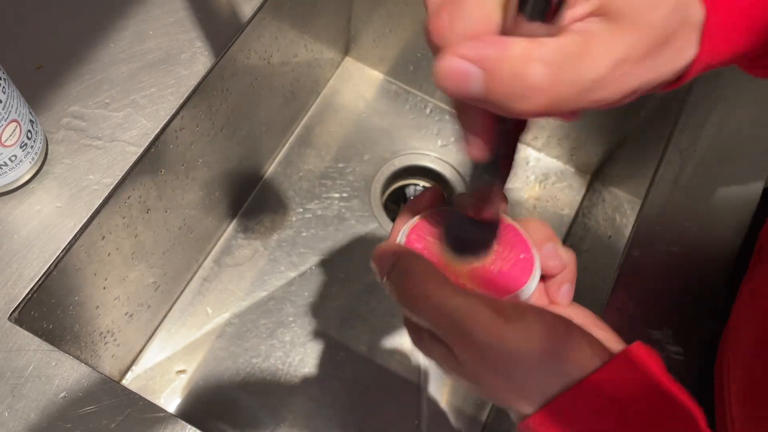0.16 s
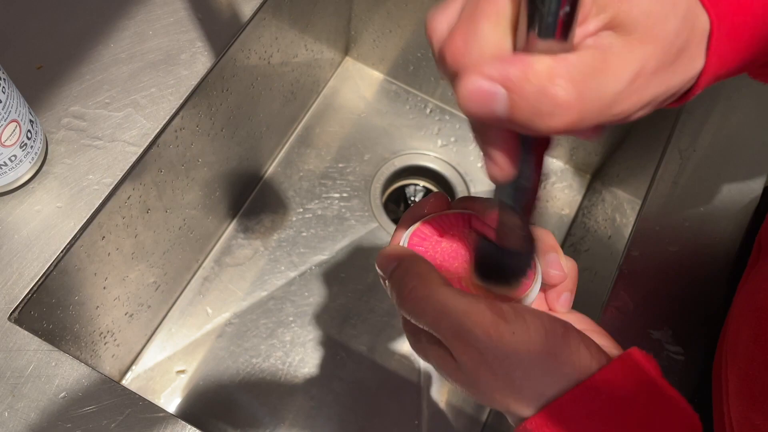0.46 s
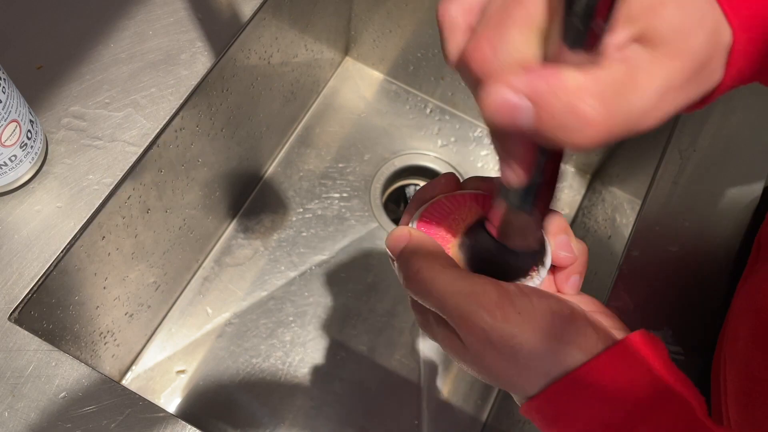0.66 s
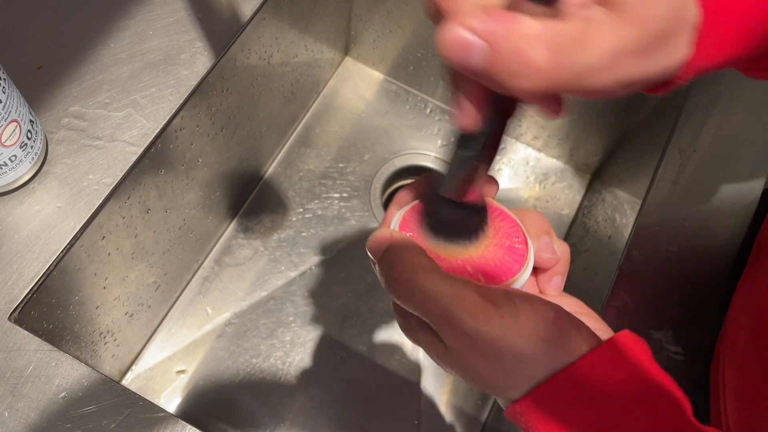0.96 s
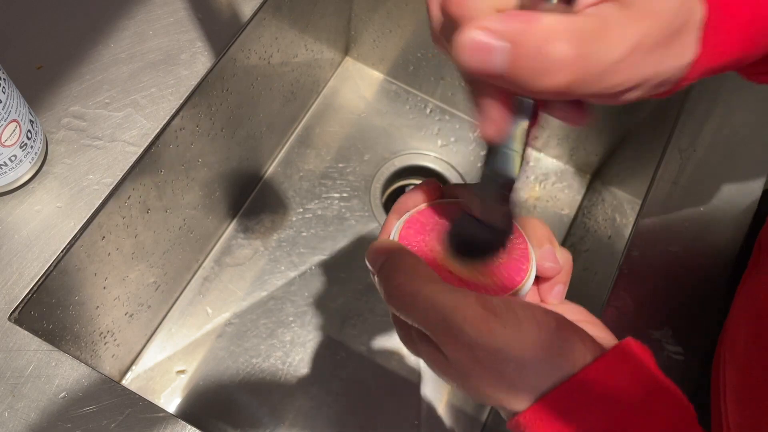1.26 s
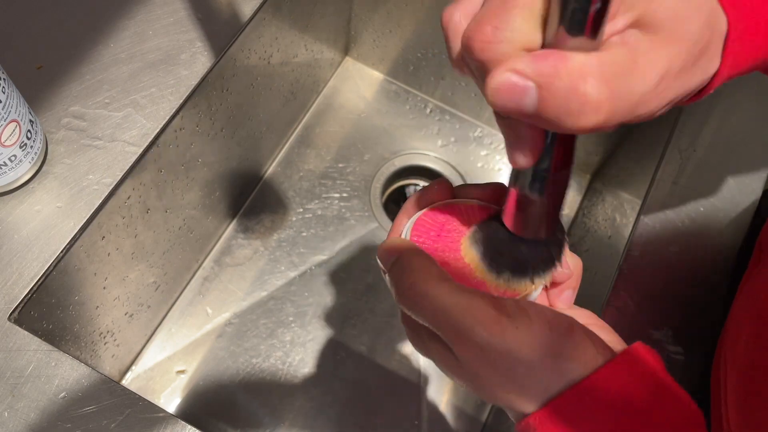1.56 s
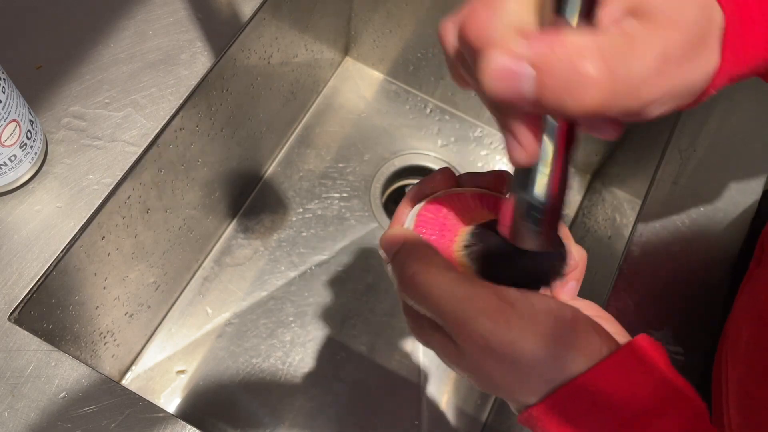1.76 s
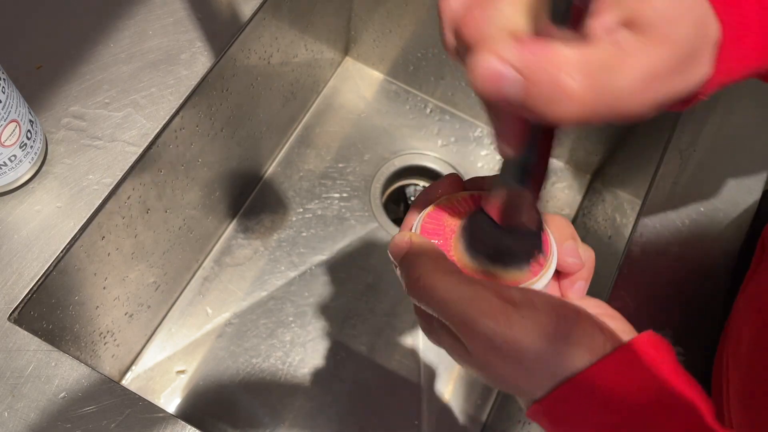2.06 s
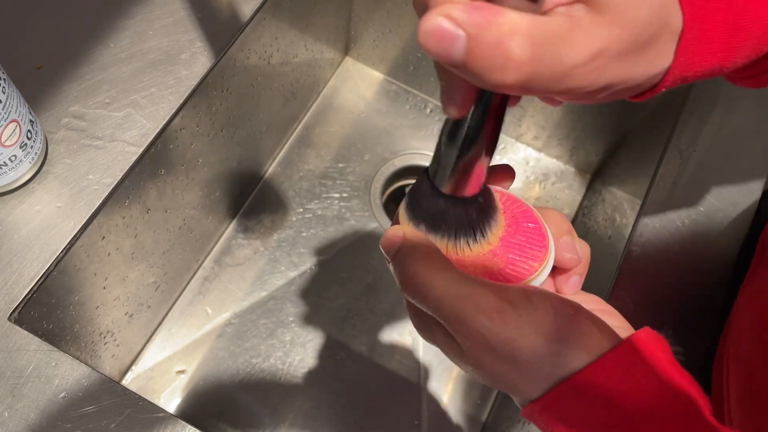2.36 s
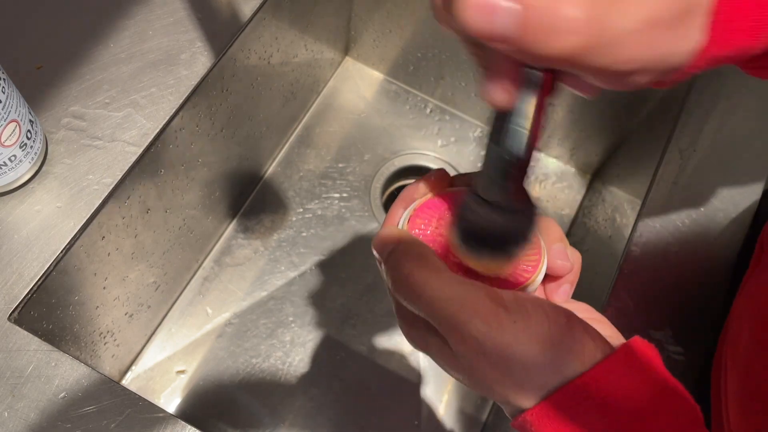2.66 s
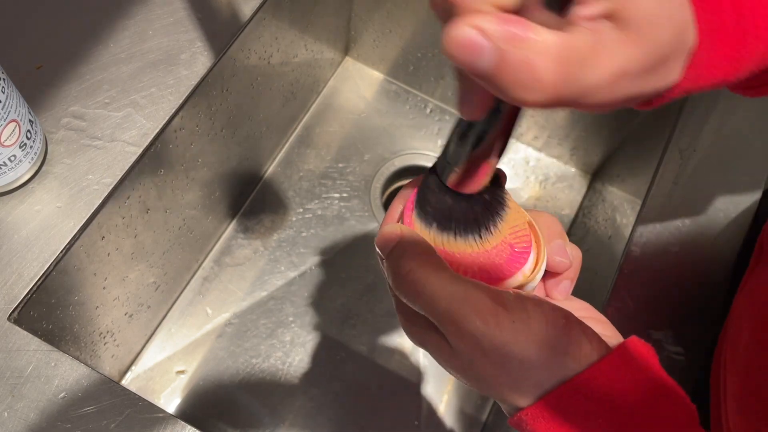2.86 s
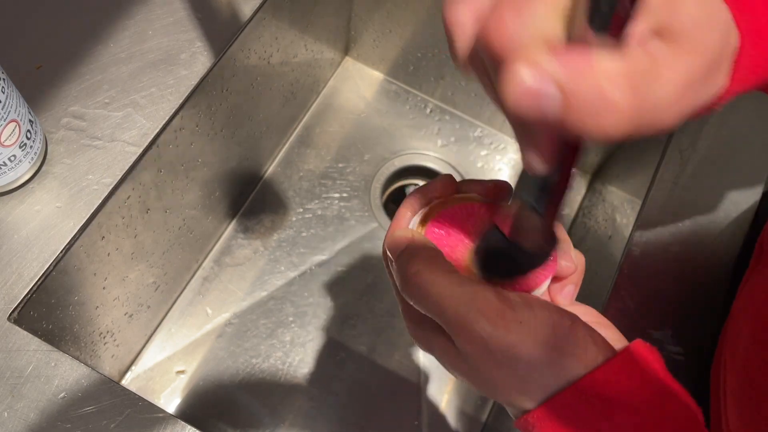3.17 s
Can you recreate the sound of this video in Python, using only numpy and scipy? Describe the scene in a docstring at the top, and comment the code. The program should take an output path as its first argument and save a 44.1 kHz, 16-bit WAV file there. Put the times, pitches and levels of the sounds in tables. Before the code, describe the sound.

Quick, scratchy strokes of wet bristles rubbing over a soapy silicone pad in a sink.

```python
"""At a steel sink, a wet brush scrubs back and forth on a ridged silicone mat, nine strokes a second.
Each stroke is a swell of tiny bristle flicks; as the lather builds it squelches and bubbles pop.
Wet clumps of bristles slap the mat, and a few hard pushes knock on it. The basin answers with a
short metallic echo, over the low hum of an appliance."""
import sys
import numpy as np
from scipy import signal
from scipy.fft import rfft, irfft
from scipy.io import wavfile
from scipy.ndimage import uniform_filter1d

SR = 44100
rng = np.random.default_rng(int(sys.argv[2]) if len(sys.argv) > 2 else 0)


def materialize(psi):
    """Save the field psi as 16-bit PCM at rate SR to the path in sys.argv[1].

    A 1-D psi becomes a single channel; in a 2-D psi each row is a channel.
    """
    bounded = np.clip(np.atleast_2d(psi).T, -1, 1)
    quanta = np.round(bounded * 32767).astype(np.int16)
    wavfile.write(sys.argv[1], SR, quanta)


N = 145530

# Cue lists; levels are relative within each layer.
# brush strokes: t/s of fastest motion, level/dB, half length/s, wet body trim/dB
STROKES = [(.002, -49.5, 0.012, 1.5), (0.084, -51, 0.02, 7.5), (0.198, -46, 0.022, -1),
           (.293, -47.5, 0.023, 2.5), (0.409, -45.5, 0.018, 0), (0.504, -44.5, 0.016, 2),
           (0.551, -57.5, 0.012, 5.5), (0.608, -41.5, 0.013, -1), (0.715, -48, 0.023, 0.5),
           (0.825, -47, 0.022, 0.5), (0.937, -44, 0.02, 1), (1.046, -49.5, 0.025, 5),
           (1.145, -53.5, 0.031, 1.5), (1.248, -47.5, 0.02, 2.5), (1.295, -58.5, 0.014, 16.5),
           (1.374, -46, 0.021, 4.5), (1.501, -50.5, 0.028, 5.5), (1.602, -51, 0.026, 2.5),
           (1.721, -49, 0.031, 2), (1.839, -49, 0.031, 4.5), (1.947, -41, 0.015, -7),
           (2.066, -48.5, 0.025, 2.5), (2.177, -45.5, 0.024, 0), (2.305, -48, 0.028, 0.5),
           (2.398, -47, 0.016, 2), (2.445, -51.5, 0.015, 5.5), (2.496, -54, 0.028, 5),
           (2.525, -50.5, 0.035, 7), (2.613, -52.5, 0.019, 2.5), (2.743, -49.5, 0.016, 1.5),
           (2.793, -49.5, 0.024, -2), (2.889, -55, 0.019, 10), (2.925, -53, 0.018, 3.5),
           (3.015, -54.5, 0.024, 1.5), (3.131, -45.5, 0.021, 5), (3.248, -48, 0.023, 8)]
# bristle clumps flicking off a ridge: t/s, level/dB, f/Hz, crack trim/dB
SNAPS = [(.182, -40, 4500, -20), (0.2018, -42, 4500, -16), (.333, -42, 3500, -22), (0.482, -48, 5000, 3),
         (0.603, -39, 5000, -20), (.711, -41, 3000, -22), (0.9387, -38, 2600, -18), (1.009, -42, 3200, -18),
         (1.346, -43, 2200, -22), (1.3735, -37, 2400, -18), (1.926, -42, 3500, -16),
         (1.945, -29, 5000, -14), (2.172, -35, 4500, -18), (2.508, -37, 3200, -22),
         (2.5382, -32, 3200, -26), (2.605, -36, 4000, -20), (2.61, -35, 2600, -22),
         (2.7743, -28, 5600, -25), (2.7838, -18, 2800, -2), (2.7866, -33, 4500, 2), (3.006, -43, 3000, -18),
         (3.084, -41, 3200, -14), (3.2071, -27, 2700, -28), (3.2127, -18.5, 3000, -19),
         (3.2171, -16, 5200, -20)]
# bubbles in the lather: t/s, level/dB, f/Hz, decay/s
POPS = [(.037, -34.5, 1333, 0.00044), (0.2458, -29.5, 2235, 0.0013), (0.878, -35, 2340, 0.00053),
        (.939, -39.5, 1370, .0025), (1.098, -42.5, 970, 0.0013), (1.373, -36.5, 1606, 0.0037),
        (1.774, -41.5, 1810, 0.0017), (2.5072, -30, 1352, 0.0025), (2.536, -23.5, 1930, 0.001),
        (2.6953, -35, 1155, 0.0023), (2.7752, -24.5, 1830, 0.0024), (3.096, -44, 1430, 0.0016),
        (3.1, -26.5, 1860, 0.0014), (3.2168, -18.5, 1620, 0.0026)]
# lather squeezed from under the brush: t/s, level/dB, decay/s
SQUELCHES = [(1.733, -58, 0.027), (1.945, -46.5, 0.01), (1.953, -50.5, 0.007), (2.166, -48.5, 0.016),
             (2.603, -43.5, 0.0071), (2.609, -40, 0.0039), (2.781, -43.5, 0.0027), (2.885, -34, 0.0079),
             (3.039, -43.5, 0.0037), (3.208, -36, 0.011), (3.217, -39, 0.0057)]
# hollow knocks of the mat: t/s, level/dB, f/Hz
THUDS = [(2.784, -42, 544), (2.89, -49, 273), (3.216, -51, 241)]

FIZZ_EQ = [(1000, -29), (2300, -11), (3200, 1.5), (4300, -1), (5100, 0.5), (6300, -0.5), (8000, -1.5),
           (10500, -6), (13300, -14.5), (15600, -15.5)]  # bright bristle flicks: f/Hz, level/dB
BODY_EQ = [(150, -12.5), (500, -28.5), (830, 0), (1050, -2), (1300, 0.5), (1600, 3.5), (2000, 3), (2600, 0),
           (6000, -8.5)]  # wet crackle of a stroke: f/Hz, level/dB
CRACK_EQ = [(150, -15), (2000, -4), (5000, -7), (8500, 10.5), (11000, -2.5), (13000, -6), (16000, -17)]  # thin top of a snap: f/Hz, level/dB
SQUELCH_EQ = [(60, 2.5), (150, -6.5), (270, 5), (400, -0.5), (520, -7.5), (760, -2.5), (1020, -5),
              (1700, -1.5), (3700, -7.5), (4700, -13), (14000, -44)]  # squeezed lather: f/Hz, level/dB
SCATTER_SEND = [(100, -23), (300, 12.5), (600, 11.5), (1700, -28), (2600, -7.5), (3500, -7), (4500, -10),
                (5200, -2), (6300, -5.5), (7300, -41), (8200, -12), (9400, -4.5), (11000, -8), (12700, -13),
                (14000, -10)]  # rubbing that arrives scattered: f/Hz, level/dB
STEEL_MODES = [(965, -7, 0.14), (1186, 0.5, 0.083), (1223, -2.5, 0.062), (1532, 9.5, 0.061),
               (1623, 1.5, 0.072), (1853, -8, 0.26), (2124, -6.5, 0.21), (2440, -26, 0.075),
               (3260, -4, 0.067), (3640, -6, 0.08), (5080, 8, 0.048)]  # ring of the basin: f/Hz, level/dB, T60/s
WALL_ECHOES = [(.0021, -62), (.0036, -41), (.0058, -24), (.0095, -25.5)]  # slapback off the basin walls: delay/s, level/dB
PORT_PHASE = [(20, 0), (2000, .05), (2500, 1.1), (2800, .35), (3700, .3), (4400, 1.0), (4850, -.3),
              (5500, .5), (6200, 1.6), (7100, 3.0), (8400, 3.25), (10200, 6.1), (12000, 6.6), (13300, 9.2),
              (15200, 9.6)]  # left microphone port's lead over the right: f/Hz, phase/rad
PORT_BALANCE = [(20, 1.5), (1900, -0.5), (2400, 1), (3300, -0.5), (4400, -8), (5400, 0.5), (16000, -0.5)]  # left port minus right: f/Hz, level/dB
ROOM_T60 = [(200, 0.1), (1500, 0.2), (4000, 0.066), (15000, 0.063)]  # room decay: f/Hz, T60/s
ROOM_SEND = [(100, -55), (500, -1), (1700, -19.5), (3500, -7), (6000, -13), (8000, -25.5), (15000, -33)]  # reverb send: f/Hz, level/dB
HUM_TONES = [(58.5, -52), (114, -64.5)]  # appliance partials: f/Hz, level/dB
HUM_FADER = [(0, 3), (.85, 1.5), (1.3, -14.5), (1.75, -5.5), (2.15, -0.5), (3.3, 3)]  # the hum dips and comes back: t/s, gain/dB
RUMBLE_EQ = [(15, 1), (25, -4), (40, -1.5), (48, 7.5), (57, 7), (75, 10), (95, -9), (116, 3), (150, -10.5),
             (290, -15), (400, -25), (900, -30.5), (2500, -42.5), (7000, -55.5), (16000, -44)]  # low noise bed: f/Hz, level/dB


def scrubbing():
    """The brush, direct and scattered to each side; the ridges make all of it flutter."""
    envelopes = strokes()
    ridges = flutter(hz=131, depth_db=1.37)
    (dry, wet), left, right = [ridges * bristles(*envelopes) for _ in range(3)]
    send = amp(read(SCATTER_SEND, np.fft.rfftfreq(N, 1 / SR)))
    scatter = irfft(rfft([left.sum(0), right.sum(0)]) * send, N)
    return tuft_drift(dry, depth_db=4.0) + tuft_drift(wet, depth_db=5.0), scatter


def strokes(rise=0.82, fall=0.84, skirt=1.486, catch=0.72, glide_db=-3, drag_db=-72):
    """Fizz and body envelopes: each stroke glides in quietly, catches, swells and fades."""
    t = np.arange(0, N, 16) / SR
    fizz = body = 0
    for s, db, half, wet_db in STROKES:
        width = half * np.where(t < s, rise, fall)
        swell = np.exp(-(abs(t - s) / width) ** skirt / 2)
        swell *= amp(glide_db * (t < s - catch * half))
        fizz += (amp(db) * swell) ** 2
        body += (amp(db + wet_db) * swell) ** 2
    return [np.interp(np.arange(N) / SR, t, np.sqrt(power + amp(drag_db) ** 2))
            for power in (fizz, body)]


def bristles(fizz, body):
    """Thousands of flicks a second blur into dry fizz on top and wet crackle underneath."""
    dry = amp(-3.0) * fizz * colour(clicks(per_s=10000, spread_db=4), FIZZ_EQ)
    wet = amp(-11.5) * body * colour(clicks(per_s=3500, spread_db=1.5), BODY_EQ)
    return np.array([dry, wet])


def tuft_drift(x, depth_db, bands=4, frames=36):
    """The colour of the rubbing drifts as the tuft bends and the foam moves."""
    spectra = signal.stft(x, nperseg=256, noverlap=192)[2]
    patches = uniform_filter1d(rng.standard_normal(spectra.shape), bands, axis=0)
    patches = uniform_filter1d(patches, frames, axis=1)
    return signal.istft(spectra * amp(depth_db * unit(patches)), nperseg=256, noverlap=192)[1][:N]


def snaps(cycles=1.83, crack_s=0.00069):
    """A wet clump slaps the mat: a cycle or two at its own pitch, and a thin bright crack."""
    t = np.arange(SR // 100) / SR
    slaps, cracks = np.zeros((2, N))
    for s, db, hz, crack_db in SNAPS:
        add(slaps, s, amp(db) * np.exp(-t * hz / cycles) * np.sin(2 * np.pi * hz * t))
        add(cracks, s, amp(db + crack_db) * np.exp(-t / crack_s) * rng.choice([-1, 1], len(t)))
    return slaps, colour(cracks, CRACK_EQ)


def lather(rise_per_s=5, pop_attack_s=0.00048, splash_s=0.0036, splash_hz=520, squeeze_attack_s=0.0027):
    """Bubbles ring with a slight upward bend and break in a splash; squeezed foam crackles."""
    t = np.arange(SR // 10) / SR
    pops, squeeze = np.zeros((2, N))
    lowpass = signal.butter(2, splash_hz, fs=SR)
    for s, db, hz, decay in POPS:
        phase = 2 * np.pi * hz * t * (1 + rise_per_s * t / 2)
        ring = np.exp(-t / decay) * np.sin(phase)
        a, b = signal.lfilter(*lowpass, rng.standard_normal((2, len(t))))
        spray = unit(a * np.cos(phase) + b * np.sin(phase))  # noise band around the bubble's pitch
        splash = 0.25 * np.exp(-t / splash_s) * spray
        add(pops, s, amp(db) * (1 - np.exp(-t / pop_attack_s)) * (ring + splash))
    for s, db, decay in SQUELCHES:
        add(squeeze, s, amp(db) * (1 - np.exp(-t / squeeze_attack_s)) * np.exp(-t / decay))
    squelch = colour(squeeze * clicks(per_s=7400, spread_db=4.5), SQUELCH_EQ)
    return amp(-1.24) * pops + amp(3.5) * squelch


def thuds(attack_s=0.00085, decay_s=0.0044):
    """The hardest pushes give a soft hollow knock."""
    t, out = np.arange(SR // 10) / SR, np.zeros(N)
    envelope = (1 - np.exp(-t / attack_s)) * np.exp(-t / decay_s)
    for s, db, hz in THUDS:
        add(out, s, amp(db) * envelope * np.sin(2 * np.pi * hz * t))
    return out


def foam(sizes=12, per_s=100, low_hz=750, high_hz=3020, level_db=-77):
    """Tiny bubbles of many sizes tick at random, dying within a cycle or two."""
    t, out = np.arange(SR // 80) / SR, np.zeros(N)
    for hz in np.geomspace(low_hz, high_hz, sizes):
        ticks = (rng.random(N) < per_s / sizes / SR) * amp(rng.uniform(-27, 0, N))
        ring = np.exp(-t * hz) * np.sin(2 * np.pi * hz * t)
        out += signal.oaconvolve(ticks, ring)[:N]
    return amp(level_db) * unit(out)


def basin(x, ring_db=-50):
    """Near walls echo the sound and the steel rings."""
    t = np.arange(SR // 4) / SR
    response = amp(ring_db) * sum(amp(db - 60 * t / t60) * np.cos(2 * np.pi * hz * t)
                                  for hz, db, t60 in STEEL_MODES)
    response[0] += 1  # direct sound
    for s, db in WALL_ECHOES:
        add(response, s, amp(db) * np.array([1, 2, 1]) / 4)  # each bounce has a softer top
    return signal.oaconvolve(x, response)[:N]


def ports(x, bearing=1):
    """Stereo image: two microphone ports differ in phase and level; bearing 0 is dead centre."""
    hz = np.fft.rfftfreq(2 * N, 1 / SR)
    side = bearing * np.array([[.5], [-.5]])
    pan = amp(side * read(PORT_BALANCE, hz)) * np.exp(1j * side * read(PORT_PHASE, hz))
    return irfft(rfft(x, 2 * N) * pan)[:, :N]


def room(x, predelay_s=0.00122, size=16384):
    """A short diffuse tail, different on each side."""
    noise = rng.standard_normal((2, size)) * (np.arange(size) > predelay_s * SR)
    hz, t, spectra = signal.stft(noise, SR, nperseg=256)
    decay = amp(-60 * t / read(ROOM_T60, hz)[:, None])
    tail = signal.istft(spectra * decay, SR, nperseg=256)[1]
    send = amp(read(ROOM_SEND, np.fft.rfftfreq(tail.shape[1], 1 / SR)))
    tail = irfft(rfft(tail / np.linalg.norm(tail[0])) * send)
    return signal.fftconvolve(x[None], tail[:, :size * 3 // 4], axes=1)[:, :N]


def appliance(rumble_db=-53, mono_below_hz=250):
    """A wavering hum in a bed of low rumble, centred in the bass and wide above."""
    t, hz = np.arange(N) / SR, np.fft.rfftfreq(N, 1 / SR)
    mid, side = rfft(rng.standard_normal((2, N))) * amp(read(RUMBLE_EQ, hz))
    side *= 0.89 * hz ** 2 / (hz ** 2 + mono_below_hz ** 2)
    rumble = amp(rumble_db) * unit(irfft([mid + side, mid - side], N))
    hum = sum(amp(db) * np.sqrt(2) * np.sin(2 * np.pi * (f * t + rng.random())) for f, db in HUM_TONES)
    return rumble + hum * amp(np.interp(t, *np.transpose(HUM_FADER)))


def clicks(per_s, spread_db):
    """A random train of clicks, a few louder than the rest."""
    size = amp(spread_db * np.minimum(rng.exponential(1, N), 4.5))
    return unit(size * rng.choice([-1, 1], N) * (rng.random(N) < per_s / SR))


def flutter(hz, depth_db):
    """A random tremolo whose motion rolls off above hz."""
    rolloff = 1 + (np.fft.rfftfreq(N, 1 / SR) / hz) ** 4
    wander = irfft(rfft(rng.standard_normal(N)) / rolloff, N)
    return amp(depth_db * unit(wander))


def colour(x, eq, size=4096):
    """Minimum-phase EQ of unit energy: attacks stay crisp."""
    log_gain = np.log(amp(read(eq, abs(np.fft.fftfreq(size, 1 / SR)))))
    response = np.exp(np.conj(signal.hilbert(log_gain)))
    kernel = np.fft.ifft(response).real[:size // 2]
    return signal.oaconvolve(x, kernel / np.linalg.norm(kernel))[:len(x)]


def amp(db):
    """Decibels to gain."""
    return 10 ** (np.asarray(db) / 20)


def unit(x):
    """Normalises to rms 1."""
    return x / np.sqrt(np.mean(x ** 2) + 1e-20)


def read(curve, hz):
    """Reads a curve on a log-frequency axis."""
    f, value = np.transpose(curve)
    return np.interp(np.log(hz + 1), np.log(f + 1), value)


def add(mix, s, sound):
    """Drops a sound into the mix at time s."""
    part = mix[max(round(s * SR), 0):][:len(sound)]
    part += sound[:len(part)]


def scene():
    """Brush and lather up front in the basin, cracks nearer the centre; scatter, room and hum behind."""
    brush, scatter = scrubbing()
    slaps, cracks = snaps()
    close = basin(brush + lather() + slaps + thuds() + foam())
    return ports(close) + ports(cracks, bearing=0.86) + scatter + room(close + cracks) + appliance()


def record(dry, cutoff_hz=16600):
    """A steep high cut on the master."""
    lowpass = signal.firwin(511, cutoff_hz, window=("kaiser", 9), fs=SR)
    return signal.oaconvolve(dry, lowpass[None], "same")


dry = scene()
out = record(dry)
materialize(out)
```